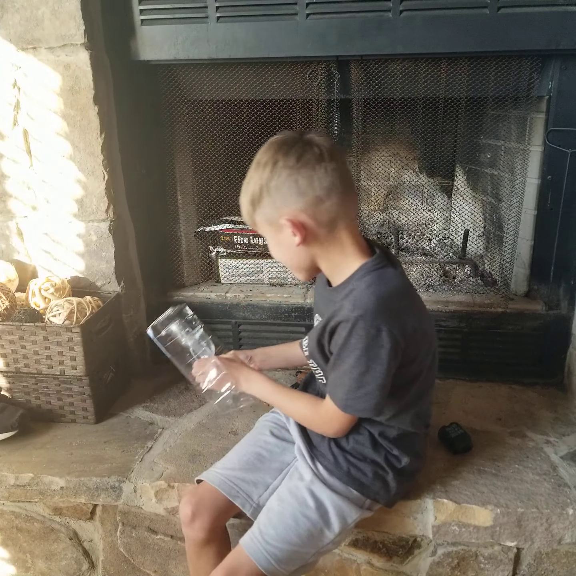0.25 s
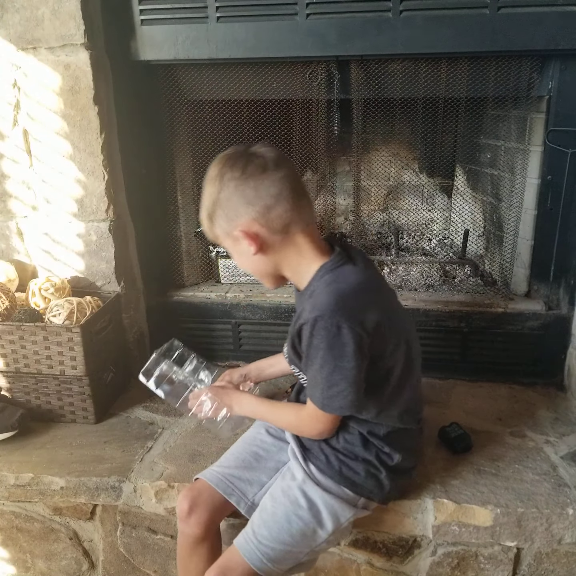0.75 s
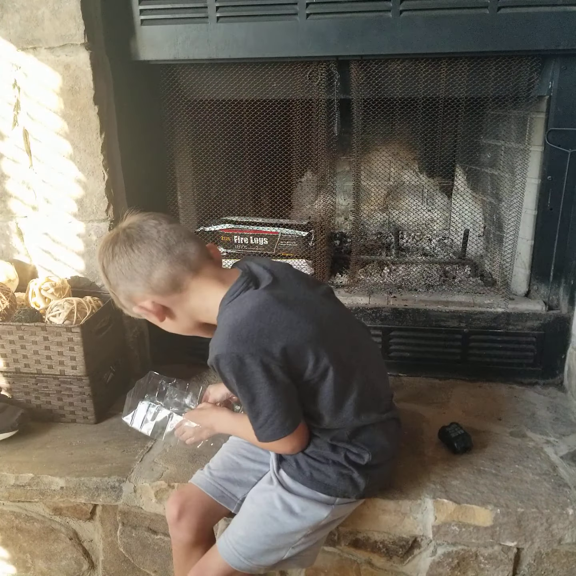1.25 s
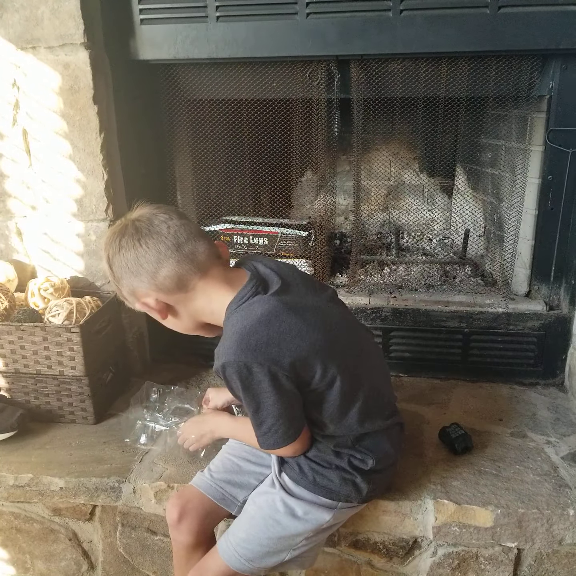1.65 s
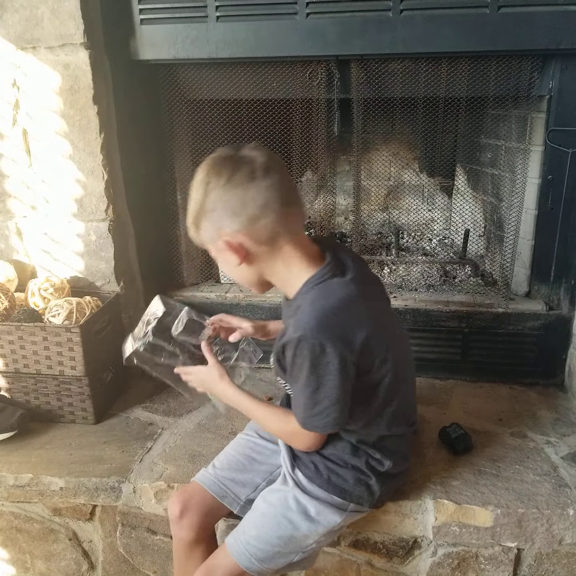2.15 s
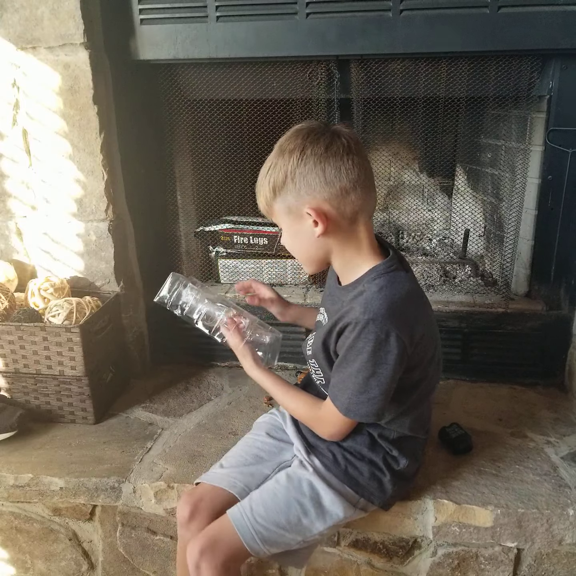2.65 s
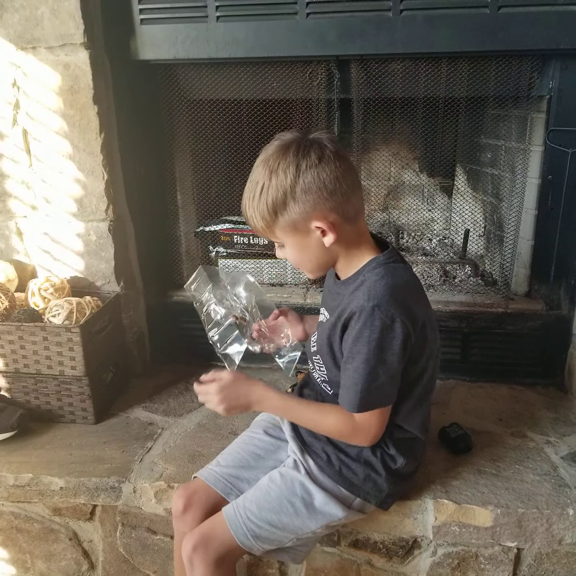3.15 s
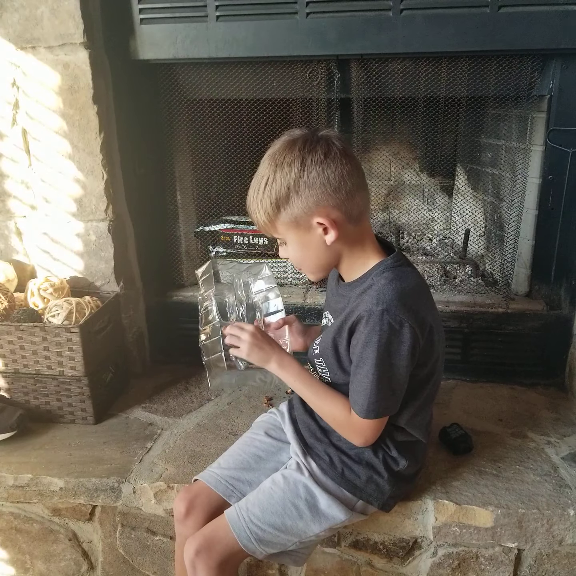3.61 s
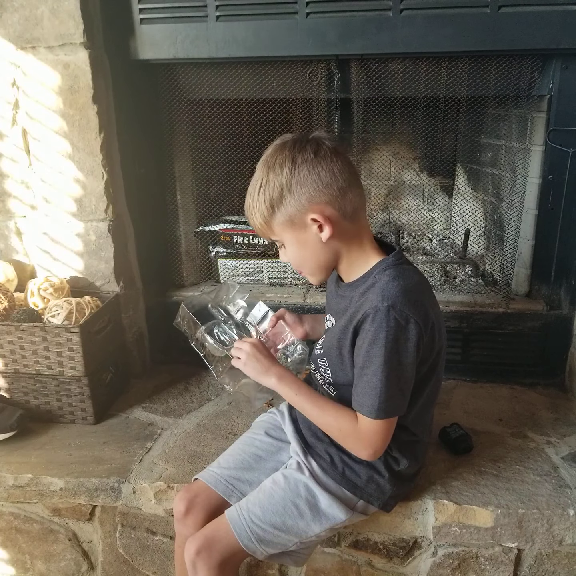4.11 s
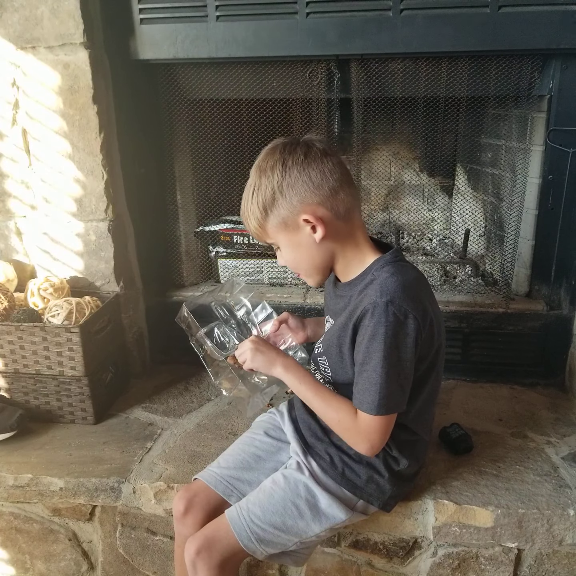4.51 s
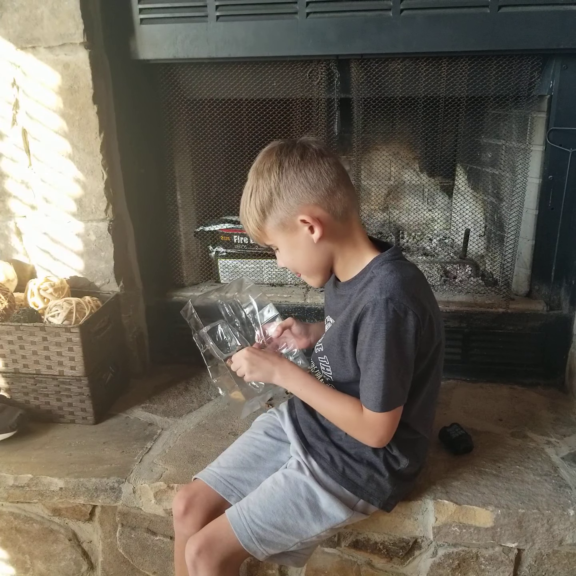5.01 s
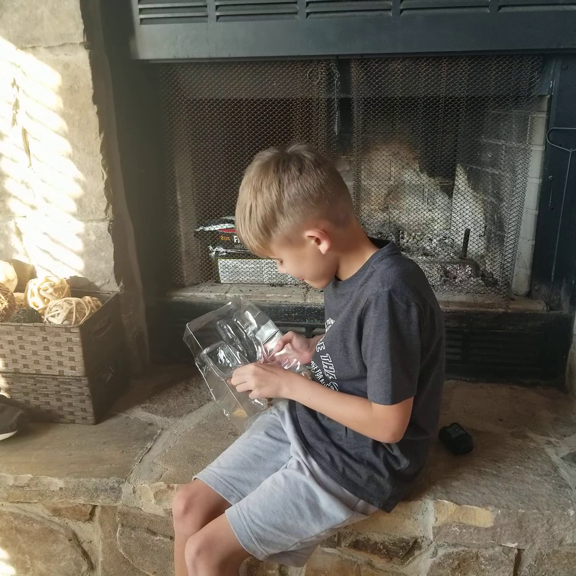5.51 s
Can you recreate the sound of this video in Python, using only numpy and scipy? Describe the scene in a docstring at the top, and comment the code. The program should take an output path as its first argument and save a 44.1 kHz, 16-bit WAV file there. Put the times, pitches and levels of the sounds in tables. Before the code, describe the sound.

Hands flex a thin plastic shell: sharp buckling snaps early, sparse faint crackles midway, then livelier popping near the end.

```python
"""A stiff clear plastic package is turned and squeezed in the hands, in a live room.
From the start, grips swell and fade: the shell flexes, fingers rub and creases crackle, all as tiny slips.
Facets buckle with dull pops and sharp cracks, made from short bursts of noise, and single creases tick.
The loudest pops come just after one second; the middle is quieter, and the buckling picks up near the end.
Behind it lie steady room noise and two wavering low tones that grow slowly; an echo follows the plastic."""
import sys
import numpy as np
from scipy import signal
from scipy.fft import rfft, irfft
from scipy.io import wavfile
from scipy.ndimage import uniform_filter1d

SR = 44100
rng = np.random.default_rng(int(sys.argv[2]) if len(sys.argv) > 2 else 0)


def file_out(sig):
    """Save sig as 16-bit WAV at sys.argv[1]."""
    # one column per channel
    cols = np.atleast_2d(sig).T
    # limit, then scale
    lim = np.clip(cols, -1, 1)
    pcm = np.round(lim * 32767).astype(np.int16)
    wavfile.write(sys.argv[1], SR, pcm)


N = 254260
TIME = np.arange(N) / SR
PULSE_HZ = np.fft.rfftfreq(4096, 1 / SR)  # the frequencies at which short pulses are designed

# Colour of the room noise. Each row: frequency in Hz, relative level in dB per Hz.
AIR_COLOUR = [(15, -35), (25, -21), (45, -8), (80, -1.5), (120, 2.5), (160, -10), (200, -6.5), (300, -14.5),
              (420, -24.5), (800, -33.5), (1200, -39.5), (3500, -46), (7000, -35.5), (9200, -48),
              (12500, -33.5), (16000, -37.5)]
# How alike the room noise is left and right. Each row: frequency in Hz, likeness from 0 to 1.
AIR_LIKENESS = [(60, 1), (250, 0.73), (600, 0.49), (2000, 0.28), (10000, .1)]
# How long the echo lasts. Each row: frequency in Hz, time to fall by 60 dB in seconds.
ROOM_T60 = [(150, 0.17), (500, 0.41), (1400, 0.43), (3700, 0.46), (7000, 0.38), (10000, 0.29),
            (16000, 0.21)]
# How strong the echo is. Each row: frequency in Hz, strength in dB.
ROOM_STRENGTH = [(100, 3), (400, -2), (1200, -4.5), (3000, -2.5), (7000, -2.74), (15000, -4)]
# Knocks or flips of the whole package.
# Each row: start in seconds, energy in dB, pitch in Hz, time to fall by 60 dB in seconds.
THUMPS = [(0.765, -15.5, 65.3, .5), (0.778, -12, 144, 0.33), (1.026, -13.5, 295, 0.083),
          (1.347, -6.5, 142.4, 0.24), (1.923, -12.5, 112, .12), (2.885, -15.5, 130, .15),
          (3.611, -21.5, 205, 0.136), (5.589, -21, 128.6, 0.092)]
# Grips of the hands. Each row: time of the peak in seconds, swell in seconds, fade in seconds,
# then peak levels of flexing, rubbing and crease crackle in dB, before the trims in handling().
GRIPS = [(0.03, 0.12, .45, -47.5, -49.5, -51.5), (0.4, 0.016, 0.13, -53.5, -53.5, -50.5),
         (0.47, .08, 0.12, -62, -51, -59), (0.588, 0.027, .13, -41.5, -50.5, -48.5),
         (0.778, 0.036, 0.086, -48, -32, -32.5), (0.98, .05, 0.1, -68, -40.5, -56.5),
         (1.09, 0.078, 0.086, -41.5, -35, -39.5), (1.25, 0.11, 0.3, -62, -59, -57.5),
         (1.357, 0.017, .11, -32.5, -22, -30.5), (1.62, 0.16, .25, -59, -53, -50.5),
         (1.78, 0.2, 0.056, -64, -46.5, -45), (1.925, 0.24, 0.25, -36.5, -40.5, -49.5),
         (2.194, 0.075, 0.062, -45, -46, -45.5), (2.35, .06, 0.21, -67, -67.5, -60.5),
         (2.545, .03, 0.13, -56, -59, -58.5), (2.69, .12, 0.19, -82, -60, -58.5),
         (2.821, 0.067, 0.18, -70, -48.5, -51), (2.89, 0.069, 0.095, -45.5, -54.5, -56),
         (3.067, 0.059, 0.082, -47, -41, -49), (3.39, .05, 0.09, -63, -56.5, -61.5),
         (3.57, 0.23, 0.24, -58.5, -58.5, -64.5), (3.67, 0.092, 0.23, -50, -54, -60),
         (4.02, 0.22, .15, -78, -88.5, -66), (4.16, 0.05, 0.13, -58.5, -60, -79.5),
         (4.52, .35, 0.14, -76, -83.5, -66), (4.625, 0.066, .09, -45.5, -58, -55.5),
         (4.84, 0.17, .3, -63, -59, -65), (5.15, 0.31, 0.58, -60, -56.5, -58),
         (5.44, 0.052, 0.22, -41, -54, -45), (5.6, 0.095, 0.067, -42.5, -38, -45),
         (5.76, 0.047, .1, -35, -43, -49)]
# Levels while the package is merely held: flexing, rubbing and crackle in dB, before the same trims.
HOLD_DB = (-79.5, -83.5, -79.5)
# Colours of flexing, rubbing and crease crackle. Each row: frequency in Hz, relative level in dB.
FLEX_COLOUR = [(100, -27.5), (220, -8), (380, -6), (750, -3), (1100, -2.5), (2000, -19), (5000, -49)]
RUB_COLOUR = [(300, -31), (800, -8.5), (1250, -5), (2500, -9), (3800, -18), (8000, -31.5)]
CREASE_COLOUR = [(1000, -25), (2800, -20.5), (4800, -2.5), (7500, -3.5), (9500, -10), (12500, -3.5),
                 (16000, -10)]
# Creases that tick on their own. Each row: start in seconds, energy in dB.
TICKS = [(0.475, -16.5), (0.696, -7.5), (0.9905, -12), (1.2982, -22.5), (1.6706, -0.5), (1.81, -7.5),
         (2.7078, -33), (2.9079, -22.5), (3.553, -28.5), (3.856, -33), (4.368, -24.5), (4.452, -37.5),
         (4.538, -32.5), (4.634, -21), (4.933, -24.5), (5.07, -28.5), (5.5952, -8.5), (5.762, -11)]
# Colour of a single tick. Each row: frequency in Hz, relative level in dB.
TICK_COLOUR = [(300, -23.5), (1200, -10.5), (2800, -5.5), (5000, 0), (7600, 2.5), (9300, -7.5),
               (12500, -2.5), (16000, -7)]
# Buckling facets. Each row: start in seconds, pop energy in dB before the trim in snaps(),
# pitch of the facet in Hz, crack energy in dB.
SNAPS = [(0.0271, -13, 610, -27), (0.0526, -2.5, 2280, -5.5), (0.2016, -21, 694, -48),
         (0.221, -16, 850, -43), (0.3207, -17.5, 640, -56), (0.3887, -8.5, 940, -15),
         (0.532, -5.5, 680, -44), (0.5793, -4.5, 955, -15), (0.7503, -5.5, 1000, -39),
         (0.757, -8, 685, -10.5), (0.7733, -4, 625, -8), (0.784, 2, 794, -17), (0.817, -5, 1080, -28),
         (0.862, -11, 1180, -13.5), (0.9517, -16.5, 1620, -26), (0.9812, -15.5, 2720, -18),
         (1.006, -10, 2760, -9.5), (1.0262, 10, 1300, 6.5), (1.031, 4, 1210, -1.5),
         (1.3446, 1.5, 1170, -2.5), (1.3464, 10, 1110, 6.5), (1.355, 2.5, 1100, -1),
         (1.3946, -1.5, 1460, 2.5), (1.609, -27, 1800, -8), (1.6657, -19, 940, -10.5),
         (1.702, -15.5, 1150, -30), (1.75, -11, 1479, -19), (1.766, -11.5, 950, -10.5),
         (1.8678, -8.5, 1050, -20), (1.888, -10, 1150, -27), (1.9069, -3.5, 1060, -8.5),
         (1.9245, 1.5, 1130, -1.5), (1.932, -7, 660, -25), (1.95, -4, 970, -32), (2.0199, -10.5, 895, -35),
         (2.1237, -9, 475, -27), (2.181, -14.5, 980, -16), (2.2833, -27.5, 518, -25),
         (2.528, -25.5, 994, -27.5), (2.785, -27, 1630, -24), (2.8785, -15, 1020, -30),
         (2.959, -23, 1200, -38), (3.35, -33, 450, -30), (3.6464, -20.5, 540, -24),
         (3.7908, -19.5, 1160, -45), (4.2571, -30, 1000, -41), (4.5889, -22, 1160, -30),
         (4.606, -14.5, 1110, -37), (4.6862, -13.5, 1910, -8.5), (4.7383, -14, 600, -39),
         (4.796, -17, 820, -24.5), (4.9028, -10.5, 1170, -31), (4.952, -13.5, 1240, -16),
         (5.1017, -25.5, 894, -32), (5.1278, -19, 1500, -15), (5.2139, -26.5, 790, -27),
         (5.2713, -12.5, 1310, -25), (5.299, -10.5, 1024, -35), (5.3238, -11, 1490, -18),
         (5.349, -23, 1083, -18), (5.367, 2.5, 1220, -8.5), (5.4214, -4, 1340, -21), (5.4418, 4, 1960, 6),
         (5.5526, -7.5, 1680, -35), (5.5887, -2.5, 766, -9.5), (5.6862, -9, 1830, -15),
         (5.7, -5, 1343, -25.6), (5.732, -10, 2310, -15), (5.7464, 0.5, 1520, -5)]
# Colour of a crack. Each row: frequency in Hz, relative level in dB.
CRACK_COLOUR = [(100, -26.5), (500, -8), (1200, -5.5), (2700, 3), (4000, 0.5), (5500, -0.5), (7600, -1.5),
                (9300, -7.5), (12500, -6), (16000, -8.5)]
# Ringing modes of the whole shell. Each row: pitch in Hz, strength in dB, time to fall by 60 dB in seconds.
SHELL_MODES = [(308, -1, 0.062), (374, -1.5, 0.072), (413, 2, 0.06), (517, -13, 0.051), (631, -5, 0.041),
               (1275, -13, .03), (1460, -4.5, 0.1), (2405, -8.5, 0.046), (2940, -15.5, 0.012)]
# Left minus right at the microphone. Each row: frequency in Hz, level difference in dB.
LEAN = [(100, -2.5), (1000, -2.5), (4000, -2), (8000, -2), (14000, 2.5)]

AIR_DB = -58  # overall level of the room noise
HUM_HZ, HUM_DB = 103.1, (-61, -50.5)  # middle pitch; level at the start and at the end, before flicker
DRONE_HZ, DRONE_DB = 63.7, (-72.5, -55)  # the same for a lower tone
GRIP_EDGE_DB = -22.5  # after one swell or fade time away, a grip is this far from its peak
PORT_LAG_S = .00004  # sound reaches the left port first
EDGE_HZ = 16000  # upper band limit


def amp(db):
    """Turns decibels into gain."""
    return 10 ** (np.asarray(db) / 20)


def evened(x):
    """Scales a sound to an average (rms) strength of 1."""
    return x / np.sqrt(np.mean(x ** 2) + 1e-20)


def unit(x):
    """Scales a sound to an energy of 1 per channel."""
    return evened(x) / np.sqrt(x.shape[-1])


def read(points, hz):
    """Reads a table between its rows, along a log-frequency axis."""
    f, value = np.transpose(points)
    return np.interp(np.log(hz + 1), np.log(f + 1), value)


def add(mix, s, sound):
    """Mixes a sound in at time s."""
    part = mix[:, max(round(s * SR), 0):][:, :sound.shape[1]]
    part += sound[:, :part.shape[1]]


def falling(t, t60):
    """A fade that drops 60 dB in t60 seconds."""
    return np.exp(-np.log(1000) * t / t60)


def mixed_pair(pair, same):
    """Makes the second channel resemble the first by the given likeness."""
    pair[1] = same * pair[0] + np.sqrt(1 - same ** 2) * pair[1]
    return pair


def pulse(gain):
    """The pulse with this spectrum that releases its energy as early as possible (minimum phase)."""
    log_gain = np.log(np.maximum(gain / gain.max(), 1e-4))
    full = np.concatenate([log_gain, log_gain[-2:0:-1]])
    spectrum = np.exp(np.conj(signal.hilbert(full)))
    return irfft(spectrum[:len(gain)])


def convolve(x, y):
    """Lets every sample of x set off a copy of y, channel by channel."""
    return signal.fftconvolve(np.atleast_2d(x), np.atleast_2d(y), axes=1)[:, :N]


def waver(size):
    """Slow random drift of rms 1, smoothed twice over size samples."""
    once = uniform_filter1d(rng.standard_normal(N), size)
    return evened(uniform_filter1d(once, size))


def air():
    """The steady rumble and faint hiss of the room, as coloured noise."""
    hz = np.fft.rfftfreq(N, 1 / SR)
    noise = rfft(rng.standard_normal((2, N)))
    noise = mixed_pair(noise, np.clip(read(AIR_LIKENESS, hz), -1, 1))
    return amp(AIR_DB) * evened(irfft(noise * amp(read(AIR_COLOUR, hz)), N))


def hum(wander_hz=4.515, drone_wander_hz=1.6, flicker_db=3.5):
    """Two low tones that slowly grow, wandering in pitch and strength."""
    out = np.zeros(N)
    for hz, stray_hz, ends_db in [(HUM_HZ, wander_hz, HUM_DB), (DRONE_HZ, drone_wander_hz, DRONE_DB)]:
        level = amp(np.linspace(*ends_db, N) + flicker_db * waver(size=3000))
        pitch = hz + stray_hz * waver(size=3000)
        # adding up the pitch over time gives the turns of the wave
        out += np.sqrt(2) * level * np.sin(2 * np.pi * np.cumsum(pitch) / SR)
    return out


def room(x, gap_s=.004, build_s=0.0031, mono_hz=600):
    """A diffuse echo tail, each band dying at its own speed; its bass is alike in both channels."""
    hz, t, bands = signal.stft(rng.standard_normal((2, SR * 2 // 3)), SR, nperseg=256)
    bands = mixed_pair(bands, np.exp(-(hz / mono_hz) ** 2 / 2)[:, None])
    t60 = read(ROOM_T60, hz)[:, None]
    bands *= amp(read(ROOM_STRENGTH, hz)[:, None]) * falling(t, t60)
    bands *= np.sqrt(2 * np.log(1000) / (t60 * SR))  # long and short bands carry comparable energy
    tail = signal.istft(bands, SR, nperseg=256)[1]
    build_up = np.clip((TIME[:tail.shape[1]] - gap_s) / build_s, 0, 1)
    return convolve(x, tail * build_up)


def thumps(attack_s=0.0038):
    """The hollow package booms briefly as a whole: fading low tones with a soft start."""
    out, t = np.zeros((2, N)), np.arange(SR // 4) / SR
    for s, db, hz, t60 in THUMPS:
        boom = (1 - np.exp(-t / attack_s)) * falling(t, t60) * np.sin(2 * np.pi * hz * t)
        add(out, s, amp(db) * unit(boom)[None])
    return out


def flutter(fast_s, slow_s, slow_db, apart_s):
    """Bending waves bounce about the sheet: a dense burst, at first alike in both channels."""
    t = np.arange(1500) / SR
    common, left, right = rng.standard_normal((3, len(t)))
    same = np.exp(-t / apart_s)
    waves = same * common + np.sqrt(1 - same ** 2) * np.array([left, right])
    fade = np.exp(-t / fast_s) + amp(slow_db) * np.exp(-t / slow_s)
    return unit(waves * fade)


def grips():
    """Strength of flexing, rubbing and crackle: each grip swells to its peak and fades, evenly in dB."""
    power = amp(HOLD_DB)[:, None] ** 2 * np.ones(N)
    for s, swell_s, fade_s, *peak_db in GRIPS:
        away = np.maximum((s - TIME) / swell_s, (TIME - s) / fade_s)
        shape = amp(GRIP_EDGE_DB * np.minimum(away, 10))
        power += (amp(peak_db)[:, None] * shape) ** 2
    return np.sqrt(power)


def slips(level, colour, per_s, spread_db, count=16):
    """Tiny slips of uneven size, each ringing one of several patches of the sheet."""
    tone, out = pulse(amp(read(colour, PULSE_HZ))), np.zeros((2, N))
    for _ in range(count):
        size = amp(spread_db * np.minimum(rng.exponential(1, N), 3))
        push_or_pull = rng.choice([-1, 1], N)
        happens = rng.random(N) < per_s / count / SR
        clicks = evened(size * push_or_pull * happens)
        burst = flutter(fast_s=0.0025, slow_s=0.0066, slow_db=1.5, apart_s=0.0064)
        patch = unit(convolve(tone, burst))
        out += convolve(clicks * level, patch)
    return out / np.sqrt(count)


def handling(flex_db=-3.5, rub_db=-1):
    """The shell flexes, fingers rub over it and its creases crackle, each as a stream of slips."""
    flexing, rubbing, creasing = grips()
    return (slips(flexing * amp(flex_db), FLEX_COLOUR, per_s=280, spread_db=4.4)
            + slips(rubbing * amp(rub_db), RUB_COLOUR, per_s=650, spread_db=5.5)
            + slips(creasing, CREASE_COLOUR, per_s=1300, spread_db=4.5))


def ticks():
    """A crease gives way without moving a facet: a bright tick with no pop."""
    out, edge = np.zeros((2, N)), pulse(amp(read(TICK_COLOUR, PULSE_HZ)))
    for s, db in TICKS:
        burst = flutter(fast_s=.0025, slow_s=0.0099, slow_db=-5, apart_s=.0004)
        add(out, s, amp(db) * unit(convolve(edge, burst)))
    return out


def facet_pop(hz, rise=1.11, fall=3.09, ring_db=-2, ring_q=3):
    """A flipping facet pushes the air hardest near its own pitch, where it also rings briefly."""
    ratio = (PULSE_HZ + 1) / hz
    ring = 1 + amp(ring_db) / (1 + (ring_q * (ratio - 1 / ratio)) ** 2)
    push = pulse(ring * ratio ** rise / np.sqrt(1 + ratio ** (2 * fall)))
    return unit(convolve(push, flutter(fast_s=0.003, slow_s=0.0068, slow_db=-2, apart_s=0.009)))


def edge_crack(edge, edge_db, crack_s=0.0036, scrape=0.23, tick_db=-5):
    """The crease at the edge of a facet cracks: a burst of noise led by a brighter, shorter tick."""
    length_s = crack_s * amp(-scrape * edge_db)  # hard cracks snap, faint ones scrape
    crack = convolve(edge, flutter(fast_s=length_s, slow_s=0.01, slow_db=0.0, apart_s=0.00031))
    # the sheet damps the highest waves first, so they come as a short tick
    bright_edge = np.diff(edge, prepend=0)
    burst = flutter(fast_s=0.26 * length_s, slow_s=.003, slow_db=-17.5, apart_s=0.00029)
    tick = convolve(bright_edge, burst)
    return unit(unit(crack) + amp(tick_db) * unit(tick))


def snaps(pop_db=-1.0):
    """Each facet flips with a pop while the crease at its edge cracks."""
    out, edge = np.zeros((2, N)), pulse(amp(read(CRACK_COLOUR, PULSE_HZ)))
    for s, facet_db, hz, edge_db in SNAPS:
        pop = amp(facet_db + pop_db) * facet_pop(hz)
        crack = amp(edge_db) * edge_crack(edge, edge_db)
        add(out, s, pop + crack)
    return out


def shell(x):
    """Every movement also rings the modes of the whole package."""
    t = np.arange(SR // 5) / SR
    ring = np.zeros(len(t))
    for hz, db, t60 in SHELL_MODES:
        scale = 2 * np.log(1000) / (t60 * SR)  # makes the dB value the gain at the mode's pitch
        ring += amp(db) * scale * falling(t, t60) * np.cos(2 * np.pi * hz * t)
    return x + convolve(x, ring)


def scene():
    """The package, its echo in the room and the background."""
    plastic = shell(snaps() + ticks() + handling())
    return plastic + room(plastic) + thumps() + hum() + air()


def record(dry, blend_hz=330):
    """Two close microphone ports hear much the same bass, differing in colour and timing; then a band limit."""
    hz = np.fft.rfftfreq(N, 1 / SR)
    left, right = rfft(dry)
    mid = (left + right) / 2
    side = (left - right) / 2 * hz / np.hypot(hz, blend_hz)  # less stereo width in the bass
    lean = amp(read(LEAN, hz) / 2) * np.exp(1j * np.pi * hz * PORT_LAG_S)  # half for each port
    heard = irfft(np.array([(mid + side) * lean, (mid - side) / lean]), N)
    band_limit = signal.firwin(401, EDGE_HZ, window=("kaiser", 8), fs=SR)
    return signal.oaconvolve(heard, band_limit[None], "same")


dry = scene()
out = record(dry)
file_out(out)
```